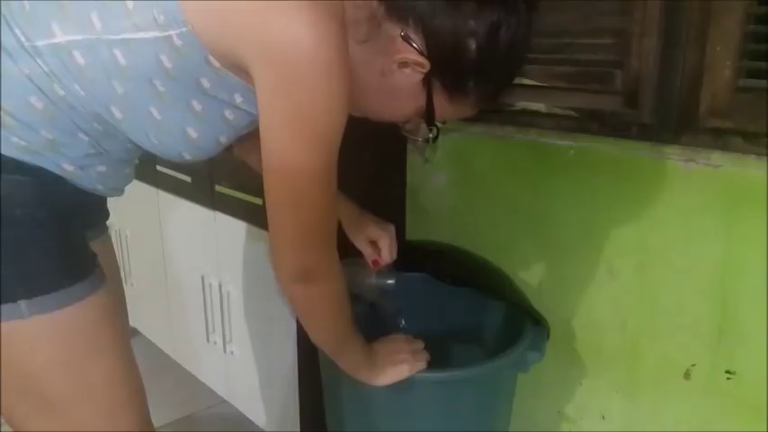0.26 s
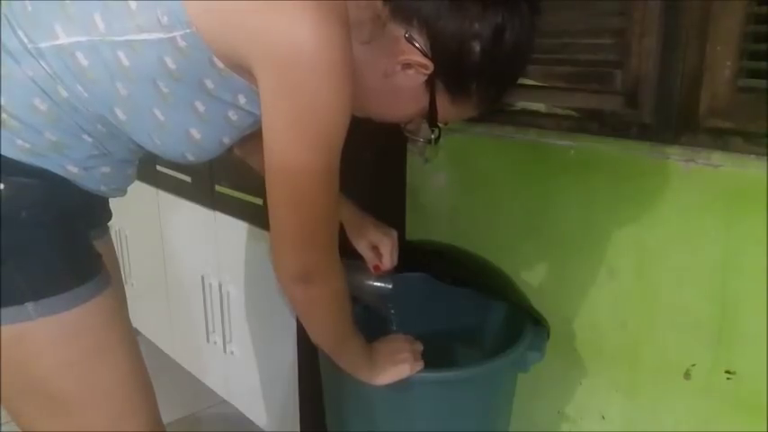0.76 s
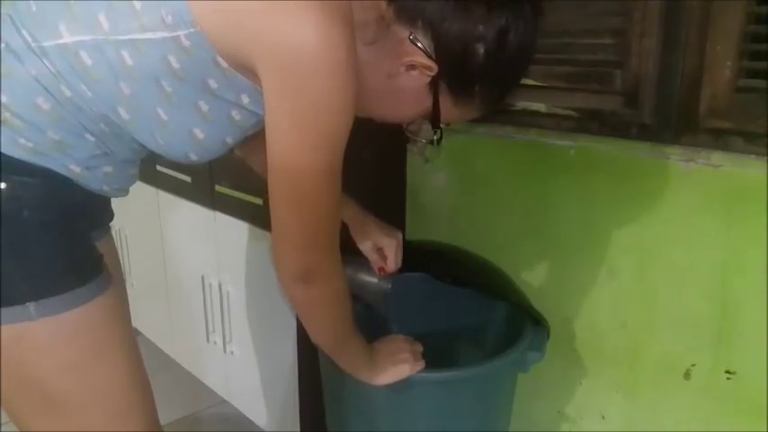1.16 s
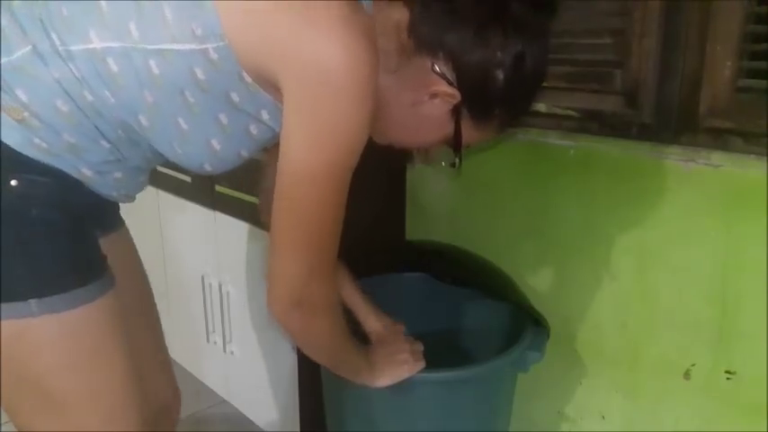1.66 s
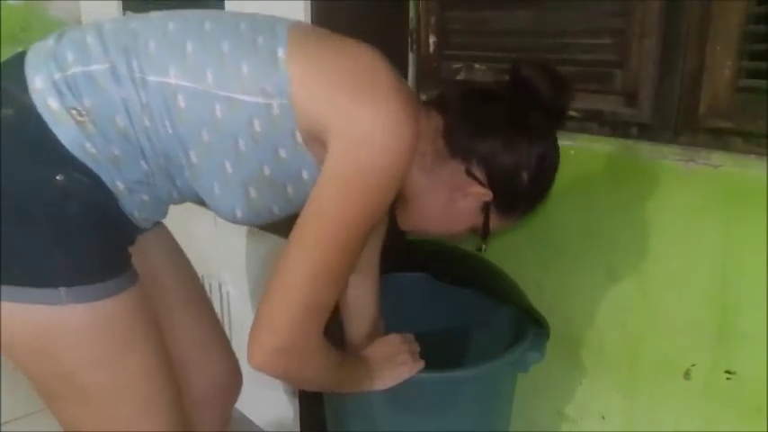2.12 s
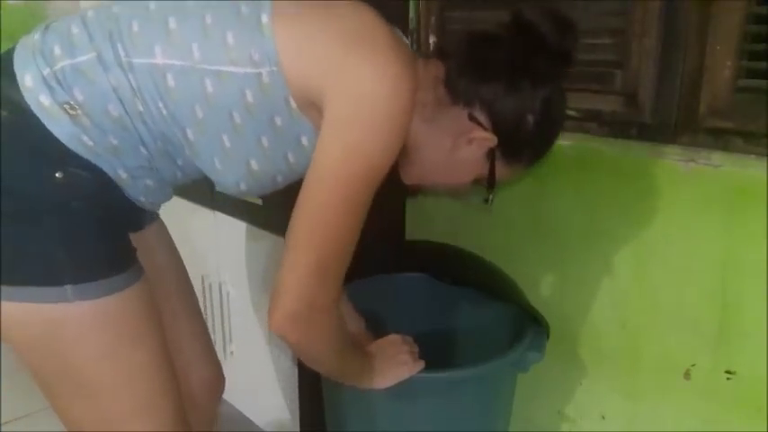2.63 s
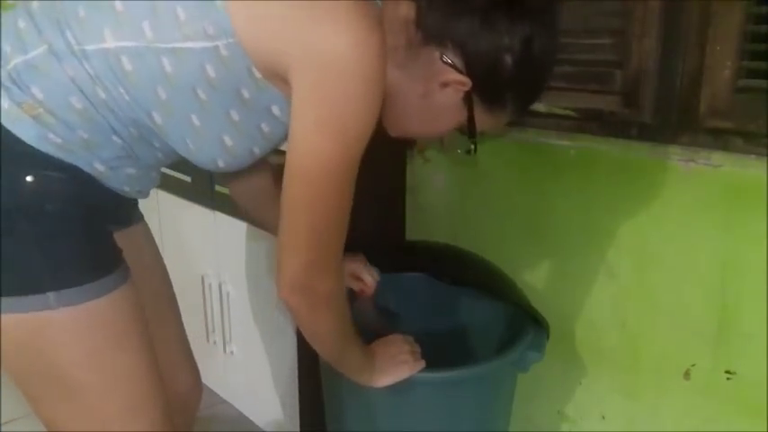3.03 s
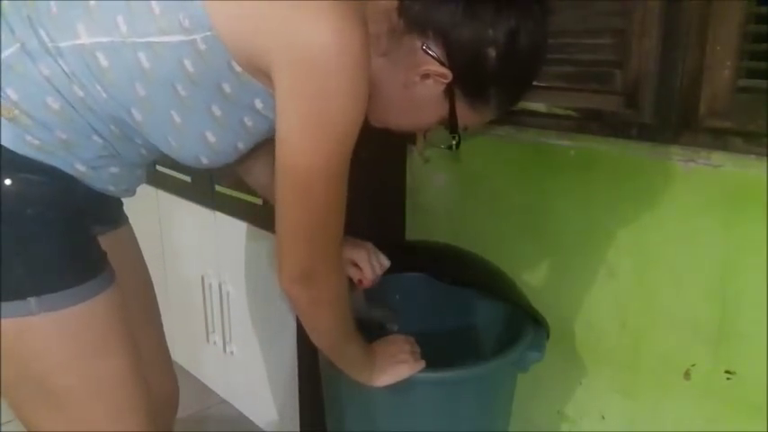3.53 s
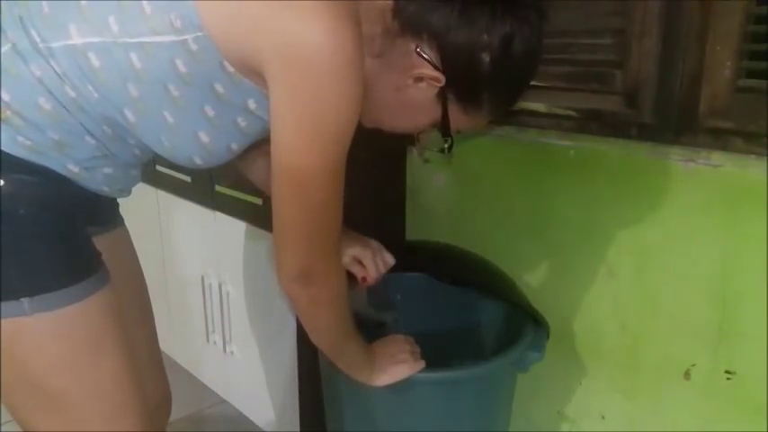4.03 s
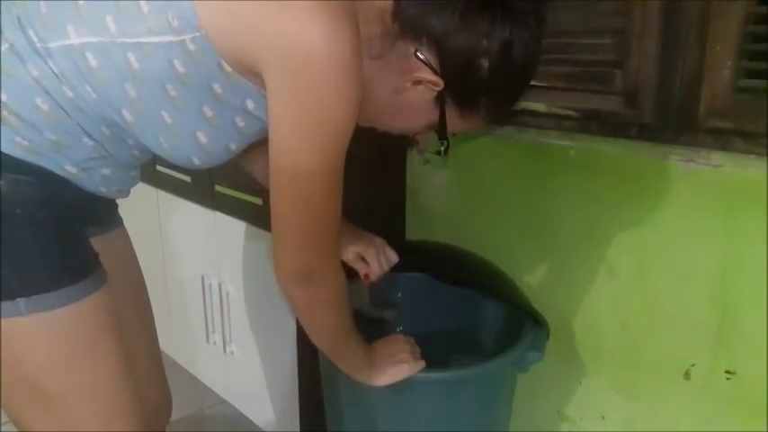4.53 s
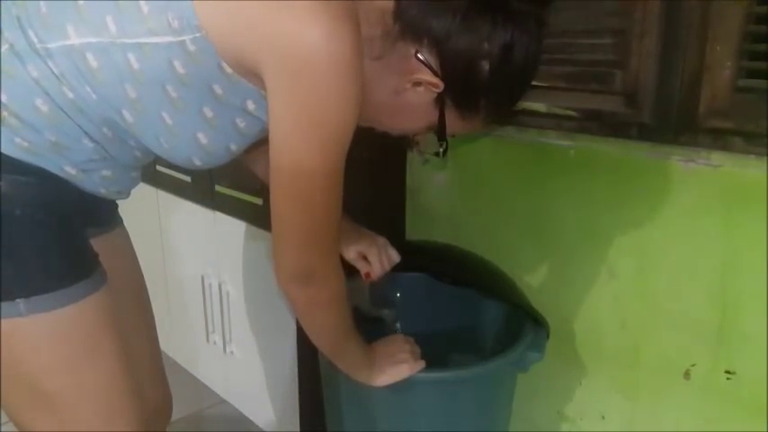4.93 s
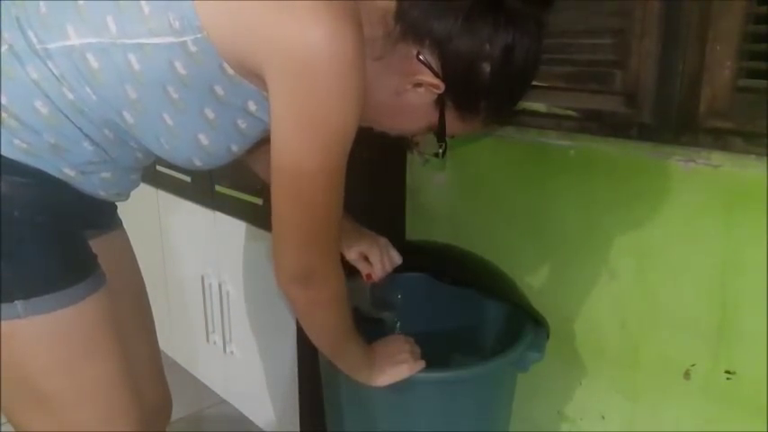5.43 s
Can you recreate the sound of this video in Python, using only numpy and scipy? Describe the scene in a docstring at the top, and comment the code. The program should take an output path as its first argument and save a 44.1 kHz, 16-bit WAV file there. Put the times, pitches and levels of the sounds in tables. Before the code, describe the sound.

Short sloshes and bubbles in a plastic tub, one loud clunk, deep gulps, then a gush of water trickling away into separate drops.

```python
"""Filling a bottle in a bucket

A bottle is pushed under water in a plastic bucket, in a small hard-walled kitchen.
The water is heard by bubble resonance (gurgle, trickle, fizz, gulps) and by slaps of shaped noise.
Two bursts of knocks excite wall thuds and decaying modes; a faint whine is a wavering sine.
After the lift the run-off thins to drips. Decaying noise echoes stand for bucket and room."""
import sys
import numpy as np
from scipy import signal
from scipy.fft import rfft, irfft
from scipy.io import wavfile
from scipy.ndimage import uniform_filter1d

SR = 44100
rng = np.random.default_rng(int(sys.argv[2]) if len(sys.argv) > 2 else 0)


def int16_out(signal):
    """Quantize to a 16-bit WAV file."""
    q = np.round(np.clip(np.atleast_2d(signal).T, -1, 1) * 32767)
    wavfile.write(sys.argv[1], SR, q.astype(np.int16))


N = 250213
TIME = np.arange(N) / SR   # seconds


def from_db(db):
    """Level law: an amplitude gain is ten to the power dB / 20."""
    return 10 ** (np.asarray(db) / 20)


def rms_one(x):
    """Power normalisation: scale to rms 1."""
    return x / np.sqrt(np.mean(x ** 2) + 1e-20)


def unit_energy(x):
    """Energy normalisation: scale each channel to energy 1."""
    return x / np.sqrt(np.sum(x ** 2, axis=-1, keepdims=True) + 1e-20)


def in_time(rows):
    """Linear interpolation: one curve over time for each column after the first."""
    s, *columns = np.transpose(rows)
    return [np.interp(TIME, s, c) for c in columns]


def at_hz(points, hz):
    """Logarithmic frequency scale: read a table between its points."""
    points = np.array(points)
    return np.interp(np.log(hz), np.log(points[:, 0]), points[:, 1])


def add(track, s, sound):
    """Superposition: mix a sound into the track at time s."""
    start = max(round(s * SR), 0)
    track[..., start:start + sound.shape[-1]] += sound[..., :max(N - start, 0)]


def passband(x, low_hz, high_hz):
    """Band limiting by a Butterworth band-pass."""
    band = [low_hz, min(high_hz, .45 * SR)]
    return signal.sosfilt(signal.butter(2, band, "band", fs=SR, output="sos"), x)


def ring(hz, t60, t, rise=0):
    """Damped oscillation: a sine loses 60 dB in t60 while its pitch climbs by the share rise."""
    return np.sin(2 * np.pi * hz * t * (1 + rise * t / t60 / 2)) * from_db(-60 * t / t60)


def click(spectrum, size=4096):
    """Minimum phase: the sharpest causal pulse with this spectrum, at energy 1."""
    hz = np.maximum(np.arange(size // 2 + 1) * SR / size, 1)
    cepstrum = irfft(np.log(from_db(at_hz(spectrum, hz))))
    # folding the cepstrum onto positive times makes the pulse causal
    return unit_energy(irfft(np.exp(2 * rfft(cepstrum[:size // 2], size))))


def patter(spectrum, t60):
    """Shot noise: a fast-dying shower of tiny impacts with this spectrum, at energy 1."""
    t = TIME[:SR // 5]
    impacts = rng.standard_normal(len(t)) * from_db(-60 * t / t60)
    return unit_energy(signal.fftconvolve(impacts, click(spectrum)))


def bubble(hz, cycles, rise):
    """Bubble resonance: it swells within a cycle, rings and rises near the surface; energy 1."""
    t = TIME[:SR // 5]
    return unit_energy(ring(hz, cycles / hz, t, rise) * (1 - np.exp(-2 * hz * t)))


# Likeness of the two channels. Each row: frequency in Hz, left-right correlation.
LIKENESS = [(100, 0.91), (250, 0.6), (500, 0.79), (1000, -0.11), (3000, 0.31), (12000, -0.25)]


def noise_bands(size):
    """Interchannel coherence: yields (Hz, half-octave stereo noise) with a correlation for each band."""
    white = rng.standard_normal((2, 2, size))
    edges = 22 * 2 ** np.arange(0, 10, .5)
    for k, (low, high) in enumerate(zip(edges, edges[1:])):
        mid, side = passband(white[k % 2], low, high)
        hz = np.sqrt(low * high)
        alike = np.clip(at_hz(LIKENESS, hz), -1, 1)
        yield hz, np.sqrt(1 + alike) * mid + np.sqrt(1 - alike) * side * np.array([[1], [-1]])


# Spectrum of the steady background, room hush with faint water fizz.
# Each row: frequency in Hz, relative density in dB per Hz.
BACKGROUND = [(25, -23), (40, -4.5), (65, -2), (100, 1), (170, 0.5), (400, -4.5), (900, -21), (1850, -41),
              (4200, -13), (7500, -28), (9000, -67.5), (15500, -6.5)]
BACKGROUND_DB = -59.5   # rms level


def background():
    """Stationary noise: weighted bands sum to a steady room hush with faint water fizz."""
    bands = sum(from_db(at_hz(BACKGROUND, hz)) * band for hz, band in noise_bands(size=N))
    return from_db(BACKGROUND_DB) * rms_one(bands)


# Reverberation of the room. Each row: frequency in Hz, decay time t60 in seconds.
ROOM_T60 = [(100, 0.25), (300, 0.43), (700, 0.38), (2500, 0.43), (7000, 0.45), (15000, 0.17)]


def kitchen(x, direct_db, bucket_db, room_db, bucket_t60=0.037, build_s=0.0063):
    """Reverberation: direct sound, fast-dying bucket echoes, then room echoes; new echoes each call."""
    t = TIME[:2 * SR // 3]
    response = 0
    for hz, band in noise_bands(size=SR):
        band = band[:, -len(t):]   # leave out the start-up of the filter
        share = np.sqrt(hz * np.log(2) / SR)   # amplitude share of the band's width
        early = unit_energy(band * from_db(-60 * t / bucket_t60))
        room_decay = from_db(-60 * t / at_hz(ROOM_T60, hz))
        late = unit_energy(band * room_decay * (1 - np.exp(-t / build_s)))
        response = response + share * (from_db(bucket_db) * early + from_db(room_db) * late)
    response[:, 0] += from_db(direct_db)
    return signal.oaconvolve(x[None], response, axes=1)[:, :N]


# A faint whine that sinks. Each row: time in seconds, mean pitch in Hz, level in dB before the room.
WHINE = [(0.1, 970, -81), (0.4, 997, -55), (0.9, 919, -56), (1.35, 959, -59.5), (1.85, 864, -60),
         (2.15, 837.5, -61), (2.7, 814, -63), (3.0, 836, -94)]


def whine(waver_hz):
    """Frequency modulation: smoothed noise makes a thin tone unsteady."""
    hz, db = in_time(WHINE)
    waver = rms_one(uniform_filter1d(rng.standard_normal(N), size=200))
    phase = 2 * np.pi * np.cumsum(hz + waver_hz * waver) / SR
    return from_db(db) * rms_one(np.sin(phase))


# Bottle against bucket. Each row: start in seconds, relative level in dB, low-pass corner in Hz.
KNOCKS = [(1.5377, -7, 9000), (1.544, 4.5, 6000), (1.567, -8.5, 7100), (1.576, -8.5, 2500),
          (3.108, -20.5, 890), (3.209, -26.5, 1210)]
# Thud of the plastic wall. Each row: frequency in Hz, relative density in dB per Hz.
WALL = [(60, -25), (110, -14), (190, -3), (300, -4.5), (600, 4), (850, 2), (1150, -7.5), (2000, -14.5),
        (2650, -26), (3200, -9.5), (4600, -20), (7600, -18.5), (9500, -32.5), (15000, -30.5)]
# Clear modes of bucket, bottle and the corner they stand in.
# Each row: frequency in Hz, relative level in dB, decay time t60 in seconds.
BUCKET_MODES = [(143.4, -7, 0.52), (199.8, -13.5, 0.6), (331, -11, 0.25), (408, -18, 0.45),
                (399, -21, 0.88), (421, -4, 0.42), (490, -22, 0.59), (535.5, -5, 0.52), (576, -3, 0.18),
                (608, 3.5, 0.23), (658.8, -4.5, .4), (790, -12.5, 0.7), (844, -10, 0.57), (1000, -16, 0.36),
                (1560, -8, 0.43), (3184, -4, 0.32), (3400, -28, 0.21)]


def knocks(wall_db, modes_db, spacing_s):
    """Modal excitation: each blow thuds the damped wall and sets modes ringing, low-passed by contact."""
    thuds, ringing, t = np.zeros(N), np.zeros((2, N)), TIME[:SR // 2]
    # each mode reaches left and right at its own phase
    lags = rng.uniform(0, spacing_s, (len(BUCKET_MODES), 2, 1))
    modes = np.array([from_db(level) * ring(hz, t60, np.maximum(t - lag, 0))
                      for (hz, level, t60), lag in zip(BUCKET_MODES, lags)])
    for s, db, corner_hz in KNOCKS:
        signs = rng.choice([-1, 1], (len(modes), 1, 1))
        struck = unit_energy(np.sum(signs * modes, axis=0))
        contact = signal.butter(1, min(corner_hz, .45 * SR), fs=SR)
        add(thuds, s, from_db(db + wall_db) * signal.lfilter(*contact, click(WALL)))
        add(ringing, s, from_db(db + modes_db) * signal.lfilter(*contact, struck))
    return thuds, passband(ringing, 167, 9000)   # keep the deep bass out of the ringing


# Water slapping shut on a pocket of air. Each row: start in seconds, relative slap level in dB,
# relative pocket level in dB, first pocket pitch in Hz.
SPLASHES = [(.612, -35, -23.5, 1174), (.625, -29.5, -21, 741), (.682, -25, -46, 780),
            (.942, -40.5, -47, 2420), (.999, -31.5, -25, 1126), (1.139, -34, -29.5, 1187),
            (1.151, -28.5, -20.5, 2280), (1.946, -47.5, -36.5, 990), (2.563, -42.5, -34.5, 3080),
            (2.706, -54.5, -34.5, 3210), (2.778, -36, -31, 646), (2.858, -35, -37.5, 708),
            (2.910, -48.5, -38, 1530), (3.106, -31.5, -32, 640), (3.411, -69, -44, 675),
            (3.491, -44.5, -45, 2920), (3.688, -41, -31, 1950), (4.166, -52.5, -45.5, 810)]
# Spectrum of a wet slap. Each row: frequency in Hz, relative density in dB per Hz.
SLAP = [(35, -33), (100, -11), (350, -2.5), (650, 4), (1300, 4), (2700, 0), (3600, -8), (7000, -13),
        (15000, -63)]
# Spectrum of flung drops. Each row: frequency in Hz, relative density in dB per Hz.
SPRAY = [(500, -16.5), (1800, -18.5), (3500, -14), (7700, -6.5), (9200, -18.5), (15500, -17.5)]


def splashes(pocket_gain_db, slap_gain_db, spray_gain_db):
    """Cavity closure: an air pocket rings, with a noise slap and spray in proportion to the slap."""
    out = np.zeros(N)
    for s, slap_db, pocket_db, hz in SPLASHES:
        add(out, s, from_db(pocket_db + pocket_gain_db) * bubble(hz, cycles=18.0, rise=0.036))
        add(out, s, from_db(slap_db + slap_gain_db) * patter(SLAP, t60=0.02))
        add(out, s, from_db(slap_db + spray_gain_db) * patter(SPRAY, t60=0.14))
    return out


# Drops flung across the surface. Each row: start in seconds, relative level in dB.
SPRAYS = [(2.006, -45), (2.257, -55.5), (2.411, -61.5), (2.735, -62), (2.912, -50), (3.903, -48.5),
          (5.093, -56)]


def sprays(gain_db, swell_s):
    """Impact noise: flung drops land in a bright shower that swells quickly and dies."""
    out = np.zeros(N)
    for s, db in SPRAYS:
        shower = patter(SPRAY, t60=0.054)
        swell = np.minimum(TIME[:len(shower)] / swell_s, 1)
        add(out, s, from_db(db + gain_db) * unit_energy(shower * swell))
    return out


# The last drops off the bottle. Each row: start in seconds, relative level in dB.
DRIPS = [(4.915, -45), (4.989, -37.5), (5.026, -41), (5.236, -36), (5.361, -42.5), (5.617, -43)]
DRIP_HZ, DRIP_PITCH_SPREAD = 1275, 0.02   # typical pitch, and its spread as a share
SATELLITE_HZ, SATELLITE_DB = 3540, -8.5   # typical pitch, and level relative to the main bubble


def dripping():
    """Entrainment: each drop traps a bubble and a smaller satellite, as rows (s, dB, Hz)."""
    scales = np.exp(DRIP_PITCH_SPREAD * rng.standard_normal(len(DRIPS)))
    rows = []
    for (s, db), scale in zip(DRIPS, scales):
        rows.append((s, db, DRIP_HZ * scale))
        rows.append((s, db + SATELLITE_DB, SATELLITE_HZ * scale))
    return rows


# Air squeezed into ever smaller bubbles. Each row: start in seconds, end in seconds,
# relative level in dB, first and last pitch in Hz before scatter.
SQUIRTS = [(1.095, 1.128, -38, 864, 3140), (2.778, 2.794, -66, 905, 3130), (4.657, 4.769, -43, 714, 2520)]


def squirts(count, pitch_scatter):
    """Size-pitch law: shrinking bubbles make an uneven climbing chain, as rows (s, dB, Hz)."""
    steps = (np.arange(count) + rng.random((len(SQUIRTS), count))) / count
    rows = []
    for (start, end, db, first_hz, last_hz), chain in zip(SQUIRTS, steps):
        for u in chain:
            scatter = np.exp(pitch_scatter * rng.uniform(-1.4, 1))
            hz = first_hz * (last_hz / first_hz) ** u * scatter
            rows.append((start + (end - start) * u, db, hz))
    return rows


# The loudest single bubbles. Each row: start in seconds, relative level in dB, first pitch in Hz.
BUBBLES = [(.264, -37, 776), (.312, -42.5, 777), (.529, -38, 1545), (1.042, -34, 650), (1.479, -47, 3300),
           (2.178, -41.5, 438), (2.19, -48.5, 3090), (2.741, -38.5, 652), (3.921, -33, 1730),
           (4.18, -40.5, 760), (4.215, -35, 2840), (4.265, -36.5, 757), (4.655, -36, 1030),
           (5.094, -43, 2830), (5.384, -43.5, 2300), (5.42, -48, 445)]
# Deep gulps of air leaving the bottle. Each row: start in seconds, relative level in dB, first pitch in Hz.
GULPS = [(2.261, -34.5, 157), (2.288, -53, 194), (3.124, -32.5, 194), (3.224, -37.5, 177),
         (4.595, -46, 242)]


def bubbles(rows, cycles, rise, gain_db):
    """Superposed bubble resonances: one for each row (s, dB, Hz)."""
    out = np.zeros(N)
    for s, db, hz in rows:
        add(out, s, from_db(db + gain_db) * bubble(hz, cycles, rise))
    return out


# Surges of stirred or running water. Each row: start in seconds, length in seconds,
# flow level in dB, lean towards large bubbles in dB.
SURGES = [(0, 0.16, -59, 0.5), (0.182, 0.088, -54.5, 0), (0.282, 0.092, -50, 3), (.42, .17, -58, 0),
          (0.569, 0.18, -51, 0), (1.02, 0.1, -55.5, 0.5), (1.114, 0.15, -51.5, 0.5), (1.476, .04, -67, -1),
          (1.57, .2, -52.5, -0.5), (2.167, 0.2, -56.5, 5.5), (2.402, 0.096, -51.5, 3.5),
          (2.641, 0.078, -67, -8), (2.72, 0.1, -50, -1.5), (3.11, 0.11, -59.5, 7.5), (4.183, 0.14, -50, 0),
          (4.965, 0.16, -57.5, 0.5), (5.479, 0.029, -60.5, 0.5)]
SURGE_RISE_S, SETTLE_DB_PER_S = 0.0083, 103   # flow builds up, holds for the surge, then settles


def surging(lean):
    """Power addition of surges, as a gain; lean is positive for large bubbles, negative for the finest."""
    power = 0
    for start, length, db, lean_db in SURGES:
        rise = np.clip((TIME - start) / SURGE_RISE_S, 0, 1)
        settled_db = SETTLE_DB_PER_S * np.maximum(TIME - start - length, 0)
        power = power + (rise * from_db(db + lean * lean_db - settled_db)) ** 2
    return np.sqrt(power)


GUSH_DB, DRIBBLE_DB, THINNING_S = -42.5, -62.5, 0.69   # first and final flow level, time constant


def run_off(start_s, rise_s=0.03):
    """Exponential relaxation: flow off the lifted bottle thins from gush to dribble, as a gain."""
    t = np.maximum(TIME - start_s, 0)
    flow_db = DRIBBLE_DB + (GUSH_DB - DRIBBLE_DB) * np.exp(-t / THINNING_S)
    return np.minimum(t / rise_s, 1) * from_db(flow_db)


# Spectrum of the bubble crowd. Each row: frequency in Hz, relative density in dB per Hz.
WATER = [(280, -13), (450, -6), (700, 0), (1000, -6), (2900, -6), (5400, -11), (7700, -11), (8900, -19),
         (15500, -19)]


def crowd(low_hz, high_hz, cycles, spread_db, count):
    """Random superposition: bubbles of random time, pitch and size, levelled to a steady rms near 1."""
    when, pitch, size = rng.random((count, 3)).T[:, :, None]
    hz = low_hz * (high_hz / low_hz) ** pitch
    t = TIME[:int(cycles / low_hz * SR)]
    size_db = spread_db * np.minimum(-np.log(size), 4)
    height = hz * from_db(at_hz(WATER, hz) + size_db)   # short rings need more height for the same power
    waves = height * ring(hz, cycles / hz, t, rise=0.025) * (1 - np.exp(-2 * hz * t))
    at = (when * N).astype(int) + np.arange(len(t))
    sound = rms_one(np.bincount(at.ravel(), waves.ravel(), N)[:N])
    return sound / np.sqrt(uniform_filter1d(sound ** 2, size=6000) + 1e-6)


LIFT_S, GURGLE_LAG_S = 3.635, .085   # run-off starts; its large bubbles take longer to be trapped
GURGLE_DB, TRICKLE_DB, FIZZ_DB = -5, -.5, 1.77   # relative to the flow


def slosh():
    """Air entrainment: flow drives crowds of large, small and finest bubbles (gurgle, trickle, fizz)."""
    gurgle = crowd(281, 1239, cycles=36, spread_db=9.5, count=650)
    gurgle *= np.hypot(surging(0.97), run_off(LIFT_S + GURGLE_LAG_S))
    trickle = crowd(1121, 4174, cycles=33, spread_db=5.5, count=1300)
    trickle *= np.hypot(surging(0), run_off(LIFT_S))
    fizz = crowd(3860, 15500, cycles=36, spread_db=4.5, count=3000)
    fizz *= np.hypot(surging(-1.45), run_off(LIFT_S))
    return from_db(GURGLE_DB) * gurgle + from_db(TRICKLE_DB) * trickle + from_db(FIZZ_DB) * fizz


def scene():
    """Superposition: water and bucket, a little to the left, over the steady background."""
    single = bubbles(BUBBLES, cycles=35, rise=0.023, gain_db=23.5)
    single += bubbles(squirts(count=14, pitch_scatter=0.17), cycles=12, rise=0.18, gain_db=17.5)
    single += bubbles(GULPS, cycles=6.6, rise=0.21, gain_db=27)
    single += bubbles(dripping(), cycles=100, rise=0.016, gain_db=20.5)
    slaps = splashes(pocket_gain_db=19.5, slap_gain_db=24.5, spray_gain_db=3.5)
    slaps += sprays(gain_db=36.0, swell_s=0.0033)
    thuds, ringing = knocks(wall_db=13.5, modes_db=9.0, spacing_s=0.00081)
    # two independent crowds with their own echoes make the water denser and wider
    heard = sum(kitchen(slosh(), direct_db=-14.0, bucket_db=-9.5, room_db=-6) for part in ("first", "second"))
    heard += kitchen(single + whine(waver_hz=26.8), direct_db=-17.5, bucket_db=-6.5, room_db=-5.5)
    heard += kitchen(slaps, direct_db=-13.5, bucket_db=-4.5, room_db=0.0)
    heard += kitchen(thuds, direct_db=-20.0, bucket_db=-5, room_db=-1.5)
    heard += ringing   # the modes carry their own decay
    return heard * from_db([[.7], [-.7]]) + background()


CUTOFF_HZ = 15900


def record(dry):
    """Band limiting and saturation: deep bass is dropped, peaks are rounded, the top is cut steeply."""
    thin = signal.sosfilt(signal.butter(2, 24, "high", fs=SR, output="sos"), dry)
    rounded = .8 * np.tanh(thin / .8)
    return signal.sosfilt(signal.ellip(12, .1, 80, CUTOFF_HZ, fs=SR, output="sos"), rounded)


dry = scene()
out = record(dry)
int16_out(out)
```